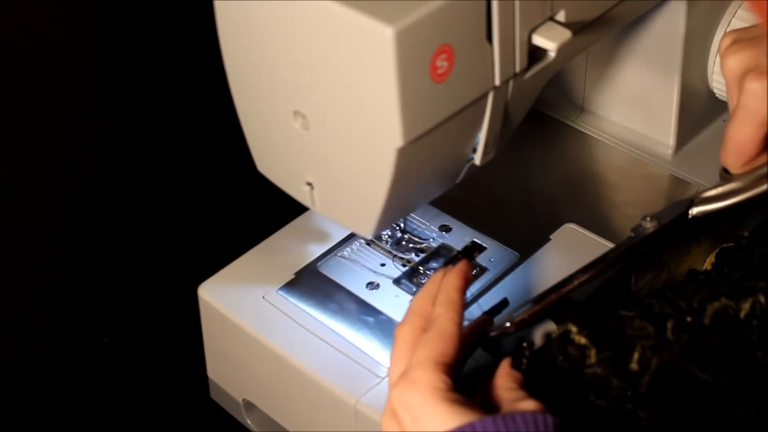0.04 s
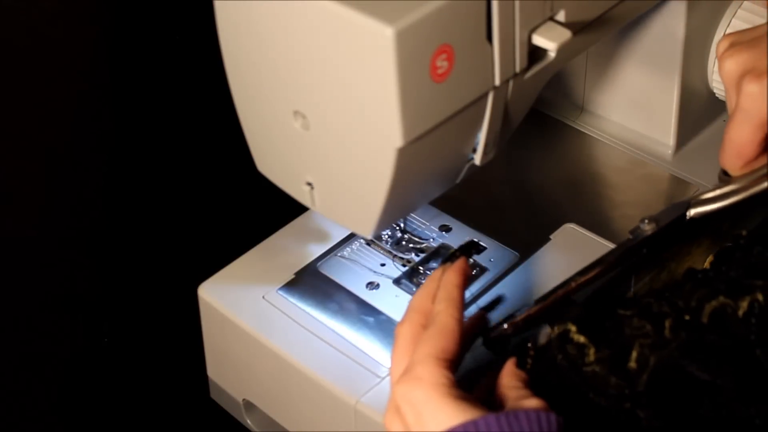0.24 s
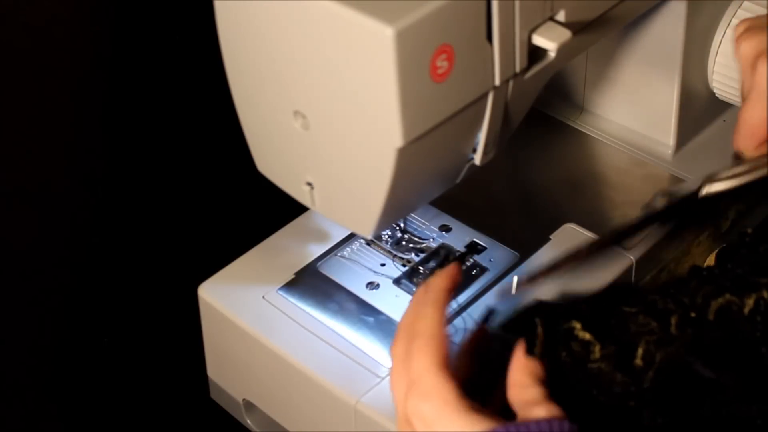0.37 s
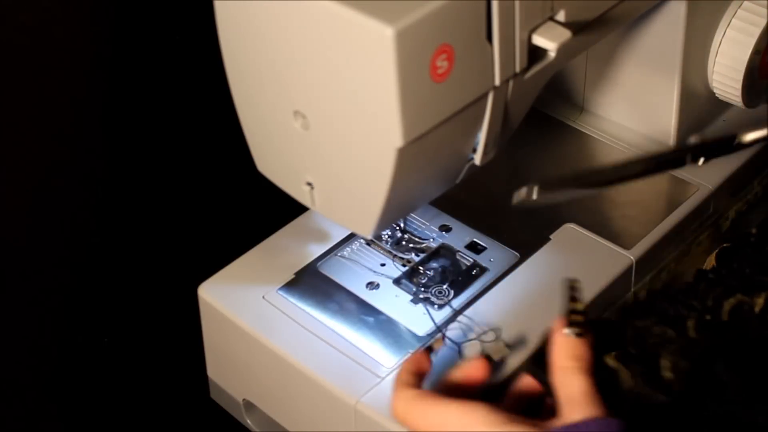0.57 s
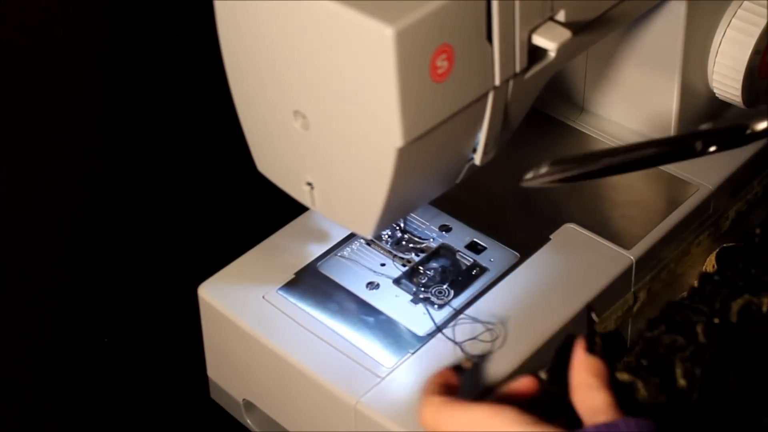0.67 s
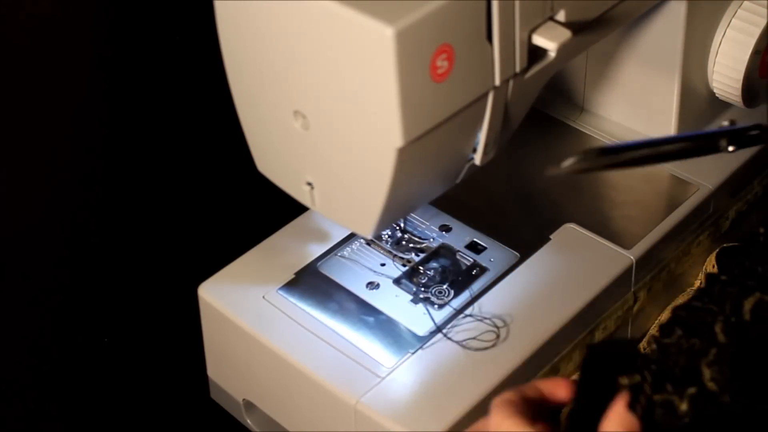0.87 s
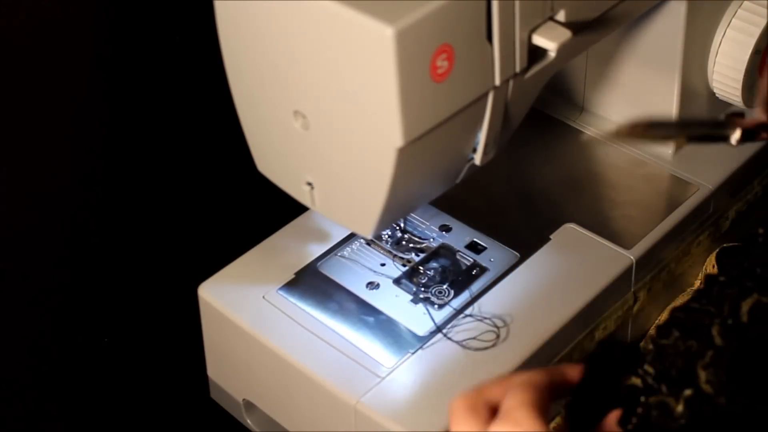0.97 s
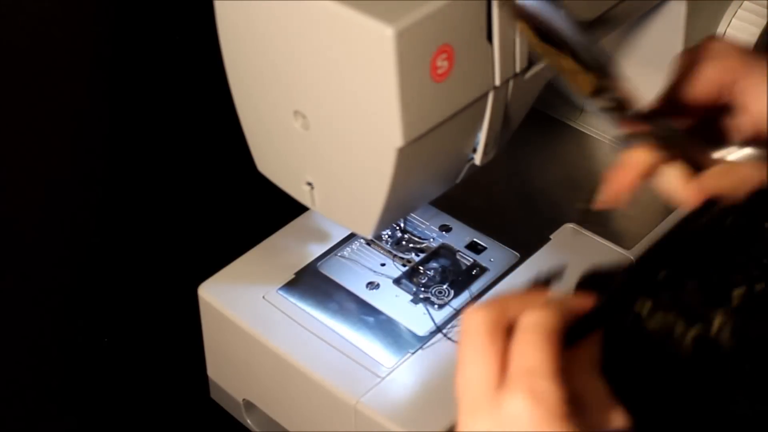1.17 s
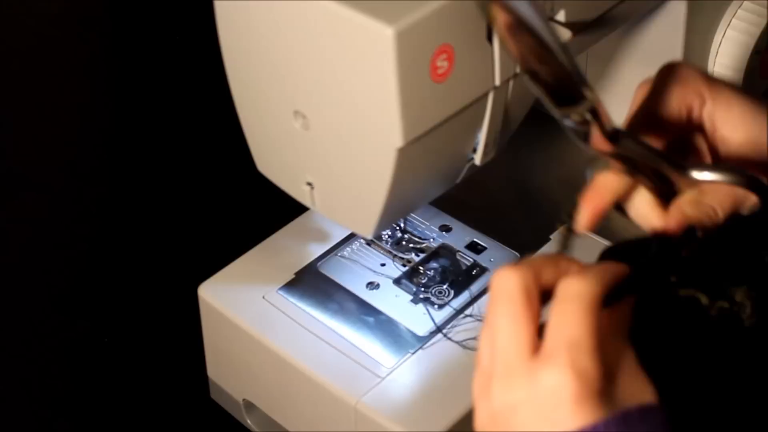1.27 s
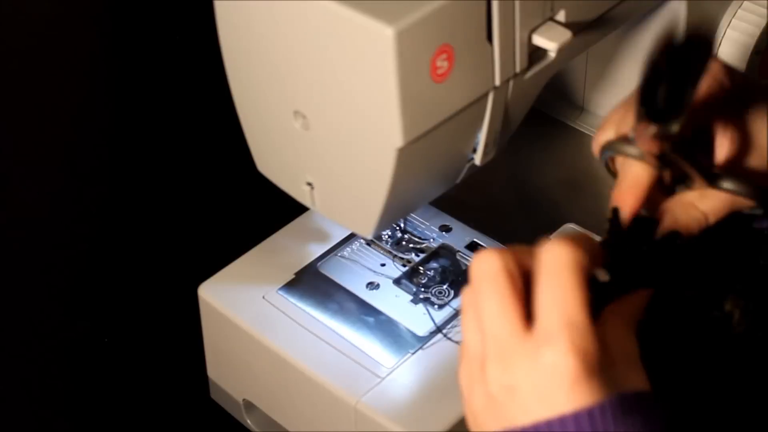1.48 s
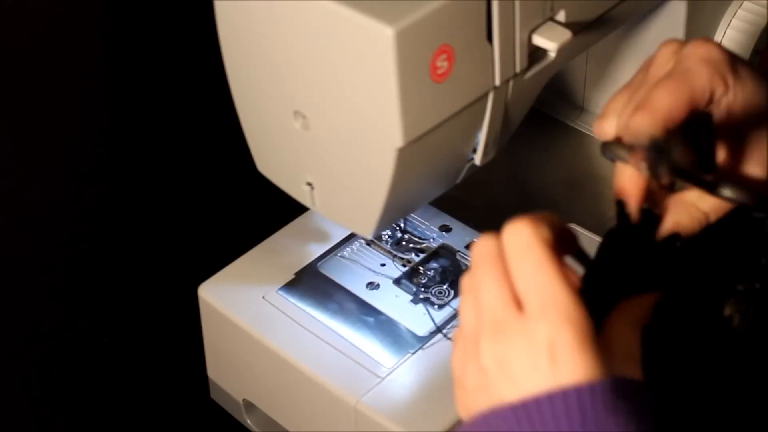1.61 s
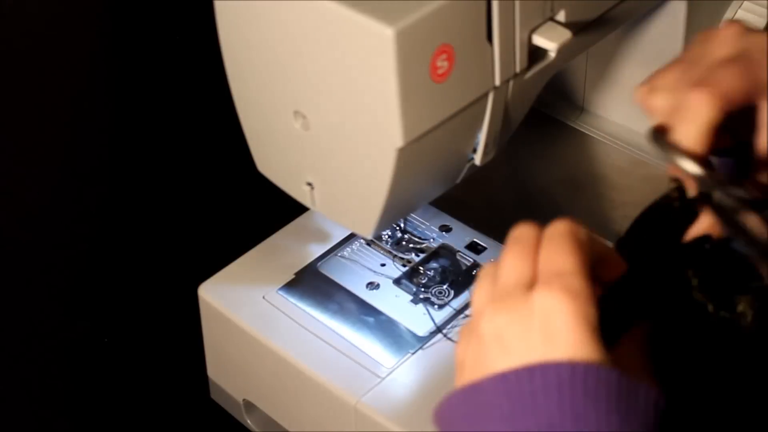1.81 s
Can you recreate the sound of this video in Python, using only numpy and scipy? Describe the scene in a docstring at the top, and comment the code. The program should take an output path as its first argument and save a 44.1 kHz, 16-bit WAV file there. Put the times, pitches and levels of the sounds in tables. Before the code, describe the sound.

Scissors snap shut once, loud and metallic, close up, then cloth rustles and small plastic knocks follow

```python
"""Scissors snapping beside a sewing machine

A small room, the scissors close to one microphone: filtered-noise cracks and decaying sines make the snap.
Blades scrape and a pivot chirps (slips and noise through steel resonances); knocks, brushes, taps and bumps
sound the plastic housing of the idle machine, and cloth rustles in a noise crackle.
Noise air and a faint hum of three sines lie behind; the recorder's gain control ducks on loud sound."""
import sys
import numpy as np
from scipy import signal
from scipy.fft import rfft, irfft, next_fast_len
from scipy.io import wavfile
from scipy.ndimage import uniform_filter1d, minimum_filter1d, map_coordinates

SR = 44100
rng = np.random.default_rng(int(sys.argv[2]) if len(sys.argv) > 2 else 0)


def persist_wave(psi):
    """Save psi, clipped to +-1, as 16-bit WAV."""
    counts = np.round(np.clip(psi, -1, 1) * 32767).astype(np.int16)
    wavfile.write(sys.argv[1], SR, np.atleast_2d(counts).T)


N = 81585
T = np.arange(N) / SR


def amp(db):
    """Decibels to gain."""
    return 10 ** (np.asarray(db) / 20)


def unit(x):
    """Scale to rms 1."""
    return x / np.sqrt(np.mean(x ** 2) + 1e-20)


def along(points, hz):
    """Read (pitch_hz, value) points on a log frequency axis."""
    f, v = np.transpose(points)
    return np.interp(np.log(hz + 1), np.log(f + 1), v)


def filtered(x, response):
    """Multiply the spectrum of x by a response of frequency."""
    m = next_fast_len(N + SR // 2)
    spectrum = rfft(x, m) * response(np.fft.rfftfreq(m, 1 / SR))
    return irfft(spectrum, m)[..., :N]


def coloured(x, spectrum):
    """Shape x by (pitch_hz, level_db) points, at rms 1."""
    return unit(filtered(x, lambda hz: amp(along(spectrum, hz))))


def resonant(x, peaks):
    """Pass x through parallel resonances of alternating sign."""
    def response(hz):
        total = 0
        for k, (centre, width, db) in enumerate(peaks):
            damping = 1j * hz * width
            total = total + (-1) ** k * amp(db) * damping / (centre ** 2 - hz ** 2 + damping)
        return total
    return filtered(x, response)


def white():
    """Fresh white noise."""
    return rng.standard_normal(N)


def decay(start, t60):
    """Silence, then an exponential fall from 1, 60 dB down after t60 seconds."""
    return (T >= start) * np.exp(-np.log(1000) * np.maximum(T - start, 0) / t60)


def bell(centre, width):
    """A Gaussian swell of height 1."""
    return np.exp(-.5 * ((T - centre) / width) ** 2)


def slips(rate):
    """Random tiny impulses of uneven size, on average rate a second."""
    return unit((rng.random(N) < rate / SR) * white())


def wobble(rate):
    """A smooth random curve, rate knots a second."""
    return map_coordinates(rng.standard_normal(int(N * rate / SR) + 4), [T * rate])


# spectrum of the still room air: pitch_hz, level_db
AIR = [(22, -31), (33, -16), (43, -1), (55, -6.5), (113, -2), (160, -7), (300, -3.5), (648, -7.5),
       (1100, -8.5), (1400, -9.5), (4040, -11.5), (7910, -15), (10100, -15.5), (15500, -23.5)]
AIR_DB = -56
# steady tones of the hum: pitch_hz, level_db
HUM = [(101.3, -67.5), (66, -73.5), (236.8, -76.5)]
HUM_WAVER_DB, HUM_DRIFT_RAD = 3.5, 0.63  # scales of the random level and phase curves


def background():
    """Still air is shaped noise; the hum is sines whose level and phase waver slowly."""
    hum = np.zeros(N)
    for hz, db in HUM:
        level = amp(db + HUM_WAVER_DB * wobble(9.66)) * np.sqrt(2)
        phase = 2 * np.pi * (hz * T + rng.random()) + HUM_DRIFT_RAD * wobble(9.85)
        hum += level * np.sin(phase)
    return amp(AIR_DB) * coloured(white(), AIR) + hum


# how long the small room rings: pitch_hz, t60_s
ROOM = [(200, 0.26), (3000, .28), (8000, 0.21), (15000, 0.18)]
ROOM_DELAY_S, ROOM_BUILD_S = 0.0039, 0.002


def room(x):
    """The diffuse answer of the walls is decaying noise; the high treble dies soonest."""
    hz, t, noise = signal.stft(rng.standard_normal(SR // 2), SR, nperseg=256)
    fall = np.exp(-np.log(1000) * t / along(ROOM, hz)[:, None])
    tail = signal.istft(noise * fall, SR)[1]
    tail = tail * np.clip((T[:len(tail)] - ROOM_DELAY_S) / ROOM_BUILD_S, 0, 1)
    return signal.fftconvolve(x, tail / np.linalg.norm(tail))[:N]


# level of the handled cloth, joined by straight lines: time_s, level_db
RUSTLE = [(0, -63), (.12, -65), (.2, -69), (.5, -67), (.8, -67), (1.03, -56), (1.2, -61.5), (1.35, -55),
          (1.45, -57.5), (1.57, -62), (1.67, -55), (1.85, -66)]
# spectrum of the cloth: pitch_hz, level_db
CLOTH = [(300, -2), (1000, -8.5), (3500, -0.5), (7000, -6.5), (12000, -2), (16000, -4.5)]
FIBRES_PER_S, FIBRE_SMOOTH_HZ = 1400, 700


def cloth():
    """Fibres catch and let go: smoothed random impulses gate noise into a fine crackle."""
    catches = filtered(np.abs(slips(FIBRES_PER_S)), lambda hz: 1 / (1 + 1j * hz / FIBRE_SMOOTH_HZ))
    crackle = np.sqrt(np.abs(catches)) * white()
    return amp(np.interp(T, *np.transpose(RUSTLE))) * coloured(crackle, CLOTH)


# hand and sleeve brushing the machine: peak_s, width_s (Gaussian sigma), level_db
BRUSHES = [(0.316, .035, -49.5), (1.308, 0.035, -49.5), (1.69, 0.023, -64.5)]
# resonances of the hollow housing: pitch_hz, width_hz, level_db
HOUSING = [(229, 11, 11.5), (649, 9.8, 3), (855, 20, 6.5), (1011, 35, 5), (1680, 210, -7.5), (3270, 99, -3),
           (3456, 40, -3), (4070, 230, -2)]
# spectrum of the brushing hiss: pitch_hz, level_db
BRUSH_HISS = [(200, -10), (600, -1.5), (2000, -5.5), (4200, -7), (6000, -12), (15000, -17.5)]
BRUSH_GRAINS_PER_S, BRUSH_HISS_DB = 2500, -3  # hiss relative to the housing sound


def brushes():
    """Skin and sleeve rub in fine grains that sound the hollow housing, with a hiss."""
    stroke = sum(amp(db) * bell(s, width) for s, width, db in BRUSHES)
    skin = slips(BRUSH_GRAINS_PER_S)
    body = unit(resonant(skin, HOUSING))
    hiss = amp(BRUSH_HISS_DB) * coloured(skin, BRUSH_HISS)
    return stroke * unit(body + hiss)


# fingertips tapping the housing: start_s, level_db
TAPS = [(1.607, -41), (1.683, -42), (1.751, -49)]
# spectrum of a tap: pitch_hz, level_db
TAP = [(100, -2), (400, 6), (900, -3), (3400, 1), (5000, -13), (15000, -13)]
TAP_T60_S = 0.026


def taps():
    """Fingertips make short decays of shaped noise."""
    return sum(amp(db) * decay(s, TAP_T60_S) for s, db in TAPS) * coloured(white(), TAP)


# soft bumps of the hand on the bed: start_s, level_db
BUMPS = [(0.142, -62), (.582, -46.5), (.63, -49), (0.999, -50), (1.607, -53)]
BUMP_HZ, BUMP_T60_S, BUMP_RISE_S = 112.7, 0.099, 0.0022


def bumps():
    """The hand sets off a low, dying sine with a softened start."""
    out = np.zeros(N)
    for s, db in BUMPS:
        rise = np.clip((T - s) / BUMP_RISE_S, 0, 1)
        out += amp(db) * decay(s, BUMP_T60_S) * rise * np.sin(2 * np.pi * BUMP_HZ * (T - s))
    return out


# small hard contacts with the housing: start_s, level_db, tilt_db_per_octave
CLICKS = [(0.8264, -46.5, -1), (1.037, -47.5, -13), (1.066, -52, -1), (1.111, -33.5, 16), (1.115, -40, 0),
          (1.119, -38, -5), (1.134, -39, 12), (1.381, -40, 17), (1.4742, -28.5, 0), (1.4784, -25.5, 5),
          (1.4819, -22, 4.5), (1.4853, -29, 1.5), (1.629, -37, -3.5)]
# spectrum of the plastic before tilting: pitch_hz, level_db
PLASTIC = [(100, -21), (700, -14), (1250, -2.5), (1900, -18.5), (3200, -5.5), (4800, -2), (7500, -5.5),
           (10500, -6), (12000, -13), (13500, -7.5), (16000, -15)]
CLICK_T60_S, TILT_PIVOT_HZ, TILT_FROM_HZ = 0.0099, 6000, 680  # the tilt is constant below TILT_FROM_HZ


def clicks():
    """Dead, short knocks of decaying noise; each contact has its own brightness."""
    out = np.zeros(N)
    for s, db, tilt in CLICKS:
        spectrum = []
        for hz, level in PLASTIC:
            octaves = np.log2(max(hz, TILT_FROM_HZ) / TILT_PIVOT_HZ)
            spectrum.append((hz, level + tilt * octaves))
        out += amp(db) * decay(s, CLICK_T60_S) * coloured(white(), spectrum)
    return out


# resonances of the scissor pivot: pitch_hz, width_hz, level_db
PIVOT = [(14600, 450, -1.5), (4260, 440, -12.5)]
SQUEAK_S, SQUEAK_WIDTH_S, SQUEAK_DB = .829, .0035, -46


def squeak():
    """The pivot chirps once, very high and brief: noise through its resonances."""
    return amp(SQUEAK_DB) * bell(SQUEAK_S, SQUEAK_WIDTH_S) * unit(resonant(white(), PIVOT))


# blades sliding over each other: start_s, length_s (before the fade out), level_db
SCRAPES = [(0.156, 0.0073, -40.5), (0.213, 0.0052, -47), (0.597, 0.018, -49), (0.612, 0.015, -46),
           (0.68, 0.018, -57), (0.695, .031, -50)]
# resonances of the scraped steel: pitch_hz, width_hz, level_db
SCRAPE_MODES = [(3360, 160, -2), (5200, 470, 0), (6950, 170, 2), (9100, 140, 6), (10340, 290, 4),
                (11240, 200, 8), (12340, 140, -4), (13600, 170, 12), (14600, 160, 0.5)]
# spectrum of steel on steel, for the scrape hiss and the snap: pitch_hz, level_db
CRACK = [(200, -48), (700, -49), (1400, -17), (2300, -33.5), (3100, -8.5), (4900, -4.5), (5750, -17),
         (6300, -5), (8700, -7), (9600, 1.5), (10500, -11), (11400, 3), (14300, -1), (15000, -8),
         (16000, -8)]
SLIPS_PER_S, SCRAPE_EDGE_S = 2500, 0.01  # the edge is the fade time
SCRAPE_HISS_DB, SCRAPE_JUDDER_DB = -2, 2


def scrapes():
    """Edge rubs on edge in quick, uneven slips that make the steel sing and hiss."""
    stroke = np.zeros(N)
    for s, length, db in SCRAPES:
        fade_in = np.clip((T - s) / SCRAPE_EDGE_S, 0, 1)
        fade_out = np.clip((s + length - T) / SCRAPE_EDGE_S + 1, 0, 1)
        stroke += amp(db) * fade_in * fade_out
    friction = slips(SLIPS_PER_S) * amp(SCRAPE_JUDDER_DB * wobble(200))
    sing = resonant(stroke * friction, SCRAPE_MODES) / np.std(resonant(friction, SCRAPE_MODES))
    return sing + amp(SCRAPE_HISS_DB) * stroke * coloured(friction, CRACK)


# ringing modes of the blades: pitch_hz, level_db, t60_s
STEEL = [(3040, -9, .12), (3760, -7, .09), (4620, -10, .12), (6250, -6, .08), (7950, -5, .05),
         (9560, -1, .07), (9730, -5, .08), (11260, 1, .1), (11590, -2, .12), (12130, -2, .12),
         (12650, 1, .14), (12970, -3, .12), (13700, -4, .12), (14200, 1, .13)]
# rebounds after the blades meet: lag_s, level_db
CHATTER = [(.0027, -3.5), (.0039, 2.5), (.0073, -9), (.0118, -24)]
SNAP_S, SNAP_DB = .2219, -6.5  # the blades meet
CRACK_T60_S, CHATTER_DB = 0.019, -6.5
BITE_S, BITE_DB = 0.00089, -0.5  # added strength while the edges grind home
RING_DB, RING_SPLIT_HZ = -2.5, 60  # the split is the random spread of each blade's pitch
RING_ROUGH_RAD, RING_ROUGH_PER_S = .9, 200


def snip():
    """The edges bite, crack and rebound in noise; two blades ring roughly, at slightly different pitches."""
    ring = np.zeros(N)
    for hz, level, t60 in STEEL:
        for blade in range(2):
            pitch = hz + rng.normal(0, RING_SPLIT_HZ)
            phase = 2 * np.pi * (pitch * T + rng.random())
            roughness = RING_ROUGH_RAD * wobble(RING_ROUGH_PER_S)
            ring += amp(level) * decay(SNAP_S, t60) * np.sin(phase + roughness)
    contacts = decay(SNAP_S, CRACK_T60_S)
    for lag, db in CHATTER:
        contacts = contacts + amp(CHATTER_DB + db) * decay(SNAP_S + lag, CRACK_T60_S)
    contacts = contacts * (1 + amp(BITE_DB) * (T < SNAP_S + BITE_S))
    crack = contacts * coloured(white(), CRACK)
    return amp(SNAP_DB) * (crack + amp(RING_DB) * ring / np.sqrt(2 * len(STEEL)))


ROOM_DB, CLICK_ROOM_DB = -9, -6.5  # sent to the room, relative to the direct sound


def scene():
    """Everything reaches one microphone, alike in both channels."""
    near = snip() + scrapes() + squeak() + brushes() + taps() + bumps() + cloth()
    knocks = clicks()
    walls = room(amp(ROOM_DB) * near + amp(CLICK_ROOM_DB) * knocks)
    mono = near + knocks + walls + background()
    return np.array([mono, mono])


LIMIT_DB, HOLD_S, RELEASE_DB_PER_S = -11, 0.14, 26
CLIP_TOP, TOP_HZ = .62, 15850  # ceiling of the rounded peaks, top of the band


def record(dry):
    """Gain control ducks at once, holds and recovers slowly; peaks are rounded off; then the band limit."""
    level_db = 10 * np.log10(np.abs(uniform_filter1d(dry[0] ** 2, size=128)) + 1e-12)
    over_db = np.maximum(level_db - LIMIT_DB, 0)
    hold = 2 * int(HOLD_S * SR / 2) + 1
    # the greatest excess within the hold time just past
    held_db = -minimum_filter1d(-over_db, hold, origin=hold // 2, mode="constant")
    # the ducking can fall no faster than the release
    release_db = RELEASE_DB_PER_S * T
    duck_db = np.maximum.accumulate(held_db + release_db) - release_db
    rounded = CLIP_TOP * np.tanh(dry * amp(-duck_db) / CLIP_TOP)
    return filtered(rounded, lambda hz: 1 / (1 + (hz / TOP_HZ) ** 160))


dry = scene()
out = record(dry)
persist_wave(out)
```